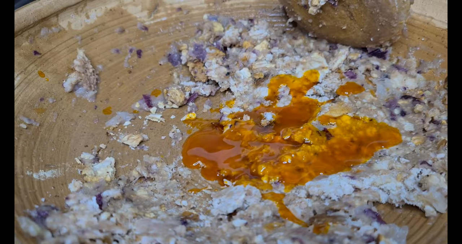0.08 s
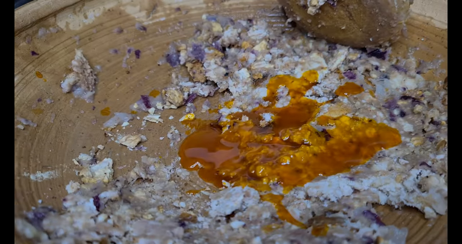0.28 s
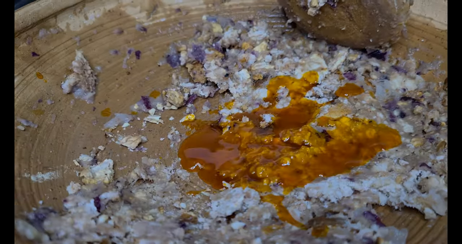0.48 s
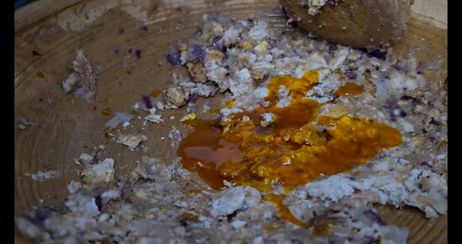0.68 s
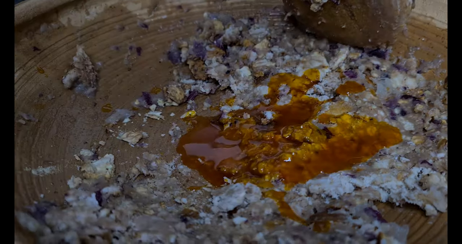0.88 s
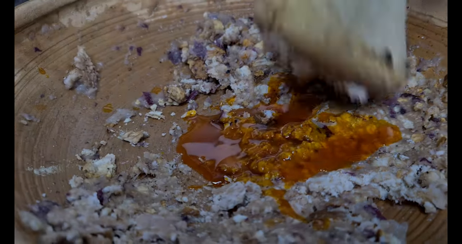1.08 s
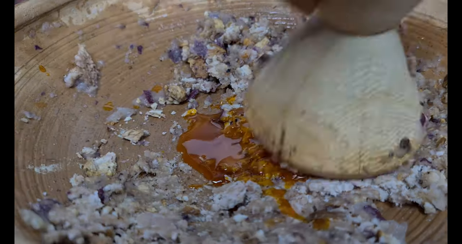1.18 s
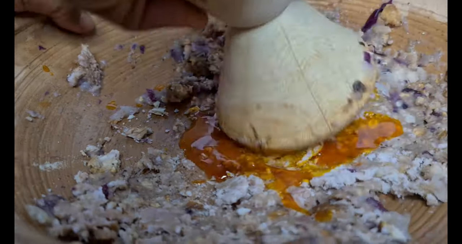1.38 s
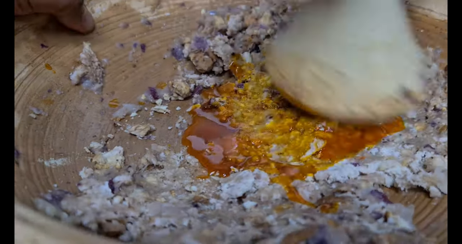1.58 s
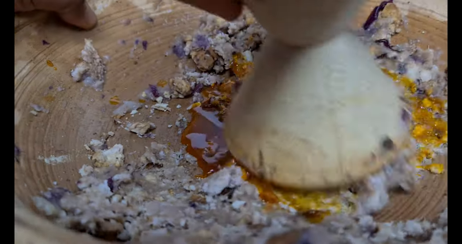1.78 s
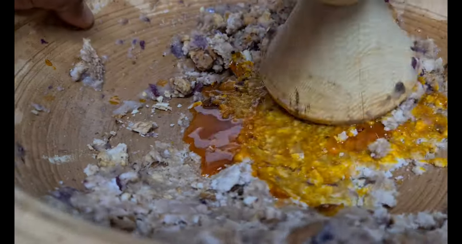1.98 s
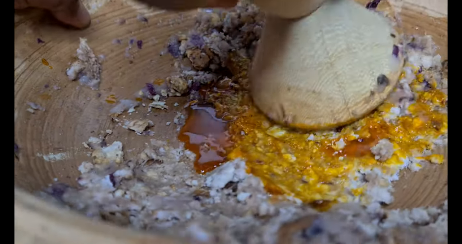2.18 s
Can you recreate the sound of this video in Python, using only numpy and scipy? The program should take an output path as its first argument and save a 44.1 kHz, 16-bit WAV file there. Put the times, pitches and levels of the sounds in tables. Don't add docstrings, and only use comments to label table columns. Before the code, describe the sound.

Mashing with a wooden pestle: first two dull dish knocks, a short scuffing slide and a bright clink, then quieter wet fizz, snaps, scrapes and low table thumps, heard close in stereo in a small kitchen.

```python
import sys
import numpy as np
from scipy import signal
from scipy.io import wavfile

SR = 44100
rng = np.random.default_rng(int(sys.argv[2]) if len(sys.argv) > 2 else 0)


def generate_wav(signal):
    frames = np.transpose(np.atleast_2d(signal))
    scaled = np.clip(frames, -1, 1) * 32767
    pcm = np.round(scaled).astype(np.int16)
    wavfile.write(sys.argv[1], SR, pcm)


def convert_level_to_amplitude(level_db):
    exponent = np.asarray(level_db, float) / 20
    return 10 ** exponent


N = 97020

# (time [s], peak level [dB])
KNOCK_EVENTS = [
    (0.2266, -39.5),
    (.230, -17),
    (0.2316, -22),
    (0.2343, -23.5),
    (.351, -18),
    (.3528, -21.5),
    (0.3551, -23),
    (.3615, -24.5),
    (.581, -22.5),
]
# (frequency [Hz], level [dB], t60 [s])
TABLE_MODES = [(204, -13, 0.03), (357.5, -12.5, 0.032), (571, -13.5, 0.018), (840, -10.5, 0.013),
               (1188, -3, 0.0089), (1644, 7, 0.0058), (2446, 0.5, 0.0063), (2950, -7.5, 0.011)]
# (time [s], peak level [dB])
CLINK_EVENTS = [
    (.580, -16),
    (0.5816, -7.5),
    (.584, -10.5),
    (.622, -26.5),
    (0.653, -22),
]
DISH_MODE_HZ = [520, 775, 1780, 2346, 2525, 2998, 4310, 4480, 4680, 6400, 7050, 8444, 10785, 13370]
# (level [dB], t60 [s])
DISH_MODES = [(-24.5, .03), (-17, 0.081), (-8.5, 0.049), (-9.5, 0.034), (-3.5, 0.046), (1, 0.025),
              (-15, 0.053), (-5, 0.016), (-7.5, 0.051), (-20.5, 0.021), (-15.5, 0.028), (-13.5, 0.11),
              (-17, 0.11), (-12.5, 0.013)]
# (time [s], level [dB])
SCUFF_EVENTS = [
    (0.3126, -23),
    (0.3161, -25),
    (.448, -38.5),
]
# (time [s], level [dB])
SLIDE_LEVEL = [(.285, -74), (.310, -54), (.314, -37), (.335, -48.5), (.40, -52), (.44, -48.5),
               (.475, -41.5), (.495, -38.5), (.515, -34.5), (.545, -42), (.575, -44), (.67, -52)]
# (time [s], peak level [dB])
SLIP_EVENTS = [
    (.448, -31.5),
    (0.4929, -23.5),
    (.504, -21),
    (.510, -22),
    (0.521, -29.5),
    (.539, -24.5),
]
# (frequency [Hz], width [Hz], level [dB])
HELD_MODES = [(1620, 78, -11.5), (2120, 78, -17.5), (2630, 60, 0), (2994, 50, -1), (4716, 136, -10),
              (6200, 150, -30), (7270, 89, -20), (7790, 77, -17), (8530, 86, -18.5)]
# (time [s], level [dB])
DRAG_LEVEL = [(.85, -65.5), (1.1, -101), (1.3, -67.5), (1.385, -59), (1.42, -52), (1.46, -53), (1.55, -72),
              (1.6, -50), (1.645, -48), (1.665, -41.5), (1.74, -73), (1.825, -47), (1.835, -41.5),
              (1.93, -57.5), (1.97, -66), (2.03, -62.5), (2.13, -69), (2.185, -46), (2.2, -52)]
# (time [s], peak level [dB], favoured frequency [Hz])
TAP_EVENTS = [(1.417, -34, 1500), (1.445, -52, 1420), (1.460, -37, 1500), (1.463, -36, 2800),
              (1.596, -36, 1100), (1.660, -42, 900), (1.664, -29, 1200), (1.6682, -28.5, 1180),
              (1.685, -31, 2300), (1.804, -45, 1310), (1.8305, -23.5, 1760), (1.838, -27, 2200),
              (1.851, -30, 820), (1.884, -37, 1500), (2.156, -37, 3080), (2.179, -41, 1600),
              (2.182, -36, 1560)]
# (frequency [Hz], level [dB], t60 [s])
BOWL_MODES = [(340, -1.5, 0.011), (737, -9, 0.028), (1180, -3, 0.014), (1530, -0.5, 0.017),
              (2280, -4.5, 0.0064), (2800, -10, 0.017), (3150, -8.5, 0.0095), (4090, -18, 0.014)]
# (time [s], ring level [dB], frequency [Hz], wide tick level [dB])
SNAP_EVENTS = [(.868, -32, 6100, -53), (0.874, -38.5, 10500, -49), (0.905, -46, 7500, -49),
               (.932, -35, 9300, -47), (1.199, -31, 7500, -38), (1.363, -34, 3600, -48),
               (1.382, -32, 3270, -56), (1.43, -37, 5200, -55), (1.444, -31, 11800, -44),
               (1.453, -38, 4350, -52), (1.594, -27, 6450, -48), (1.5997, -21.5, 6350, -29.5),
               (1.629, -33, 8000, -42), (1.704, -29, 6900, -50), (1.721, -45, 12500, -50),
               (1.737, -46, 6950, -53), (1.767, -29, 7650, -49), (1.809, -40, 12100, -46),
               (1.8307, -20, 7570, -29.5), (1.842, -46, 11100, -44), (1.851, -20, 7300, -42),
               (1.870, -24, 5640, -36), (1.877, -35, 5600, -48), (1.929, -19, 8500, -33),
               (1.955, -37, 5300, -48)]
# (time [s], level [dB])
SQUEEZE_LEVEL = [(.84, -68.5), (.93, -64.5), (.98, -66.5), (1.08, -62.5), (1.125, -55), (1.2, -53.5),
                 (1.29, -61.5), (1.44, -55.5), (1.53, -55.5), (1.57, -57.5), (1.6, -44.5), (1.68, -49.5),
                 (1.745, -62), (1.82, -51), (1.86, -44), (1.96, -61.5), (2.13, -66), (2.18, -46)]
# (frequency [Hz], level [dB per Hz])
FOOD_COLOUR = [(1300, -19.5), (3000, -15), (6500, -15.5), (11000, -19.5), (16000, -22.5)]
# (time [s], length [s], level [dB], frequency [Hz])
SQUEAK_EVENTS = [
    (1.291, 0.058, -58, 3900),
    (1.309, 0.048, -58, 2930),
    (1.976, 0.17, -57, 1523),
]
# (time [s], peak level [dB], frequency [Hz], length [s])
SWAY_EVENTS = [(.232, -38, 144, 0.024), (0.251, -33, 71.3, 0.096), (.345, -31.5, 77, 0.038),
               (.43, -54.5, 135, .04), (.49, -41, 65.4, 0.18), (0.574, -36.5, 72, 0.068),
               (0.849, -38, 99.3, 0.019), (.9, -69, 62.8, 0.08), (1.437, -39, 79, 0.028),
               (1.59, -27, 110.7, 0.063), (1.624, -26.5, 67.7, 0.071), (1.646, -30, 116, 0.013),
               (1.80, -32.5, 86, 0.013), (1.83, -34.5, 145.3, 0.0324), (1.844, -25.5, 88.3, 0.026),
               (1.98, -27, 87.4, 0.032), (2.015, -26.5, 69.4, 0.032), (2.086, -37, 64, 0.038),
               (2.171, -38, 118.4, 0.027)]
# (frequency [Hz], level [dB])
AIR_COLOUR = [(25, -39), (48, -7.5), (88, -8), (241, -17), (420, -17.5), (700, -18.5), (1220, -28),
              (9000, -53.5)]
# (frequency [Hz], level [dB])
HUM_PARTIALS = [(57, -58.5), (63, -54.5), (119, -57.5), (147, -57.5), (240, -62.5)]
# (frequency [Hz], likeness [0-1])
STEREO_LIKENESS = [(60, 0.8), (150, 1), (300, 0.6), (650, 0), (5000, 0.03)]
# (frequency [Hz], t60 [s])
ROOM_DECAY = [(100, 0.53), (500, 0.31), (2000, 0.32), (5000, 0.4), (12000, 0.22)]


def dish():
    s, db = np.transpose(CLINK_EVENTS)
    strike_db = rng.normal(0, 1.5, (len(s), len(DISH_MODES), 3))
    rub = curve(SLIDE_LEVEL, hold=False) * grains(2600, uneven_db=3, clump_db=2.6)
    scuff = burst(*np.transpose(SCUFF_EVENTS), length_s=0.0024)
    held_drive = 0.19 * rub + convert_level_to_amplitude(-21) * scuff + 0.88 * impulses(*np.transpose(SLIP_EVENTS))
    out = table(lambda k: convert_level_to_amplitude(-23) * rub)

    spread = 0.011
    cluster = [(0, -1.5), (spread, -6), (-1.6 * spread, -10)]  # (relative detuning, level dB)
    for k, (hz, (level_db, t60)) in enumerate(zip(DISH_MODE_HZ, DISH_MODES)):
        for j, (split, loss_db) in enumerate(cluster):
            struck = impulses(s, db - 6 + strike_db[:, k, j])
            out = out + convert_level_to_amplitude(level_db + loss_db) * ring(struck, hz * (1 + split), t60) * (-1) ** k

    for k, (hz, width_hz, level_db) in enumerate(HELD_MODES):
        t60 = np.log(1000) / np.pi / (width_hz * 1.58)
        gain = convert_level_to_amplitude(level_db + 3.4 * drift(19))
        out = out + gain * ring(width_hz / 60 * held_drive, hz, t60) * (-1) ** k

    crack = burst(s, db - 12.5, length_s=0.0036)
    dry_contact = crack + convert_level_to_amplitude(-7) * rub + scuff
    return out + bandpass(dry_contact, 2000, 13000)


def knocks():
    s, db = np.transpose(KNOCK_EVENTS)
    mode_db = rng.normal(0, 1.5, (len(s), len(TABLE_MODES)))
    crack = bandpass(burst(s, db - 29.5, length_s=0.005), 3500, 8500, order=4)
    return table(lambda k: impulses(s, db - 3.0 + mode_db[:, k])) + crack


def table(drive):
    rings = 0
    for k, (hz, level_db, t60) in enumerate(TABLE_MODES):
        rings = rings + ring(convert_level_to_amplitude(level_db) * drive(k), hz, t60)
    return -signal.sosfilt(signal.butter(4, 4400, fs=SR, output="sos"), rings)


def bowl():
    s, db, spot_hz = np.transpose(TAP_EVENTS)
    ridges_per_s, tap_focus_db_per_octave, ridge_damping = 1800, 14.5, 0.58
    rub = curve(DRAG_LEVEL) * grains(2 * ridges_per_s, uneven_db=3.5, clump_db=1.5)
    out = convert_level_to_amplitude(-1) * bandpass(rub, 280, 3600)
    for k, (hz, level_db, t60) in enumerate(BOWL_MODES):
        off_spot_db = tap_focus_db_per_octave * abs(np.log2(hz / spot_hz))
        tapped = ring(impulses(s, db - 3.0 - off_spot_db), hz, t60)
        rub_drive = 0.29 * convert_level_to_amplitude(level_db + 3.38 * drift(20.4)) * rub
        rubbed = ring(rub_drive, hz, t60 * ridge_damping)
        out = out + (tapped + rubbed) * (-1) ** k
    return out


def snaps():
    out = 0
    for s, db, hz, _ in SNAP_EVENTS:
        t60 = 8.2 / hz
        pop = hz / 3500 * impulses([s], [db - 15.0])
        out = out + ring(ring(pop, hz, t60), hz, t60)
    s, _, _, wide_db = np.transpose(SNAP_EVENTS)
    tick = burst(s, wide_db, length_s=0.00079)
    return out + signal.sosfilt(signal.butter(2, 3500, "high", fs=SR, output="sos"), tick)


def squelch():
    fizz = np.array([[grains(7700, uneven_db=3.5, clump_db=1.1) for _ in "ms"] for _ in "ab"])

    def patchy(hz):
        return convert_level_to_amplitude(at_hz(FOOD_COLOUR, hz) + 1.5 * drift(12))

    flicker = convert_level_to_amplitude(2.2 * drift(69))
    return curve(SQUEEZE_LEVEL) * flicker * rms_one(bands(fizz, patchy, low_hz=1290))


def squeaks():
    t = np.arange(N) / SR
    out = 0
    for s, length_s, db, hz in SQUEAK_EVENTS:
        swell = np.sin(np.pi * np.clip((t - s) / length_s, 0, 1))
        out = out + convert_level_to_amplitude(db) * swell * rms_one(ring(rng.standard_normal(N), hz, 0.02))
    return out


def sways():
    out = np.zeros(N + SR)
    for s, db, hz, length_s in SWAY_EVENTS:
        t = np.arange(int(3 * length_s * SR)) / SR
        u = t / length_s
        envelope = (1 - np.exp(-(u / 0.13) ** 2)) * np.exp(-u ** 2.0)
        start = int(s * SR)
        out[start:start + len(t)] += convert_level_to_amplitude(db) * np.sin(2 * np.pi * hz * t) * envelope
    return out[:N]


def room_tone():
    def air_gain(hz):
        top_loss_db = 32 * max(np.log2(hz / 9000), 0)
        return convert_level_to_amplitude(at_hz(AIR_COLOUR, hz) + 2.0 * drift(1.02) - top_loss_db)

    air = rms_one(bands(rng.standard_normal((2, 2, N)), air_gain))
    hum = 0
    for hz, db in HUM_PARTIALS:
        cycles = hz * np.arange(N) / SR + 0.045 * drift(2.2)
        hum = hum + convert_level_to_amplitude(db + 1.7 * drift(11.0)) * np.sin(2 * np.pi * cycles)
    return convert_level_to_amplitude(-53) * air + hum


def room():
    t = np.arange(int(.7 * SR)) / SR
    noise = rng.standard_normal((2, 2, len(t)))
    echo = bands(noise, lambda hz: convert_level_to_amplitude(-60 * t / at_hz(ROOM_DECAY, hz)), low_hz=50)
    rise = 1 - np.exp(-t / 0.00081)
    return rms_one(echo * rise) / np.sqrt(len(t))


def place(x, lag_s, pan_db, wet_db, echo):
    right = np.interp(np.arange(N) - lag_s * SR, np.arange(N), x)
    direct = np.array([x * convert_level_to_amplitude(pan_db / 2), right * convert_level_to_amplitude(-pan_db / 2)])
    return direct + convert_level_to_amplitude(wet_db) * signal.fftconvolve(x[None], echo)[:, :N]


def bands(source, shape, low_hz=25):
    out = 0
    edges = low_hz * 2 ** np.arange(0, np.log2(17000 / low_hz), 1 / 3)
    for k, (a, b) in enumerate(zip(edges, edges[1:])):
        centre_hz = np.sqrt(a * b)
        mid, side = bandpass(source[k % 2], a, b)
        alike = np.clip(at_hz(STEREO_LIKENESS, centre_hz), 0, 1)
        stereo = np.sqrt(1 + alike) * mid + np.sqrt(1 - alike) * side * [[1], [-1]]
        out = out + shape(centre_hz) * stereo
    return out


def ring(drive, hz, t60):
    r, w = convert_level_to_amplitude(-60 / (t60 * SR)), 2 * np.pi * hz / SR
    return signal.lfilter([0, np.sin(w)], [1, -2 * r * np.cos(w), r * r], drive + 1e-18)


def impulses(s, db):
    out = np.zeros(N)
    out[(np.asarray(s) * SR).astype(int)] = convert_level_to_amplitude(np.asarray(db))
    return out


def burst(s, db, length_s):
    envelope = signal.lfilter([1], [1, -np.exp(-1 / (length_s * SR))], impulses(s, db))
    return envelope * rng.choice([-1, 1], N)


def grains(per_s, uneven_db, clump_db):
    sizes = convert_level_to_amplitude(uneven_db * np.minimum(rng.exponential(1, N), 5)) * rng.choice([-1, 1], N)
    arrives = rng.random(N) < per_s / SR
    return rms_one(sizes * arrives * convert_level_to_amplitude(clump_db * drift(26.5)))


def drift(rate_hz):
    r = np.exp(-80 * np.pi * rate_hz / SR)
    noise = rng.standard_normal(N // 40 + 2002)
    slow = signal.lfilter([1], [1, -2 * r, r * r], noise)[2000:]
    return np.interp(np.arange(N) / 40, np.arange(len(slow)), rms_one(slow))


def curve(rows, hold=True):
    s, db = np.transpose(rows)
    return convert_level_to_amplitude(np.interp(np.arange(N) / SR, s, db, left=-150, right=db[-1] if hold else -150))


def at_hz(points, hz):
    point_hz, value = np.transpose(points)
    return np.interp(np.log(hz), np.log(point_hz), value)


def bandpass(x, low_hz, high_hz, order=2):
    return signal.sosfilt(signal.butter(order, [low_hz, high_hz], "band", fs=SR, output="sos"), x)


def rms_one(x):
    return x / np.sqrt(np.mean(x ** 2) + 1e-20)


def scene():
    echo = room()
    near = place(knocks() + dish(), lag_s=0.00045, pan_db=2.2, wet_db=-3, echo=echo)
    mash = place(bowl() + snaps() + squeaks(), lag_s=0.00007, pan_db=2.2, wet_db=-9.5, echo=echo)
    fizz = squelch() * convert_level_to_amplitude(np.array([[.7], [-.7]]))
    sway = place(sways(), lag_s=0.00046, pan_db=0, wet_db=-15.5, echo=echo)
    return near + mash + fizz + sway + room_tone()


def low_pass(x):
    return signal.sosfilt(signal.butter(12, 16810, fs=SR, output="sos"), x)


def record(dry):
    ceiling = 1.4
    rounded = ceiling * np.tanh(dry / ceiling)
    low_cut = signal.butter(3, 42, "high", fs=SR, output="sos")
    top_cut = signal.cheby2(10, 30, 15700 * 1.03, fs=SR, output="sos")
    mix = signal.sosfilt(np.vstack([low_cut, top_cut]), rounded)
    return low_pass(mix)


dry = scene()
out = record(dry)
generate_wav(out)
```